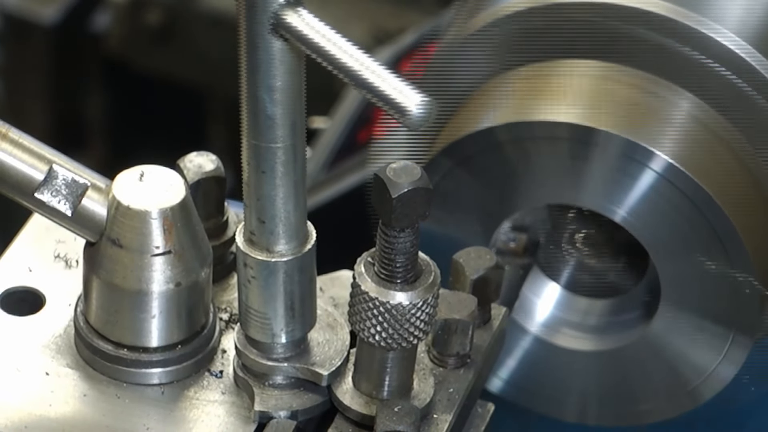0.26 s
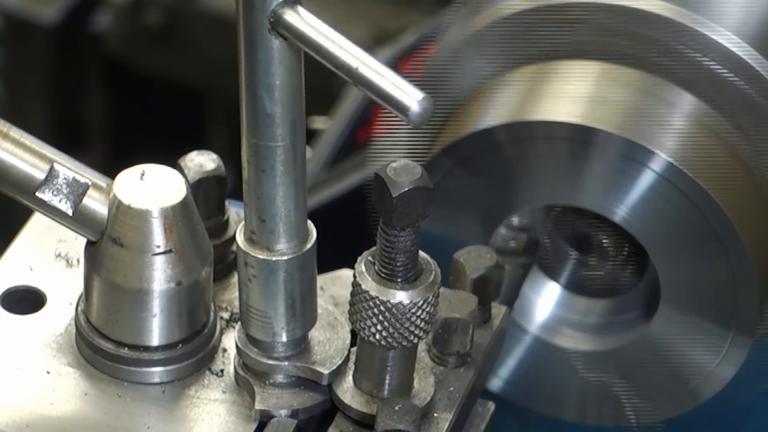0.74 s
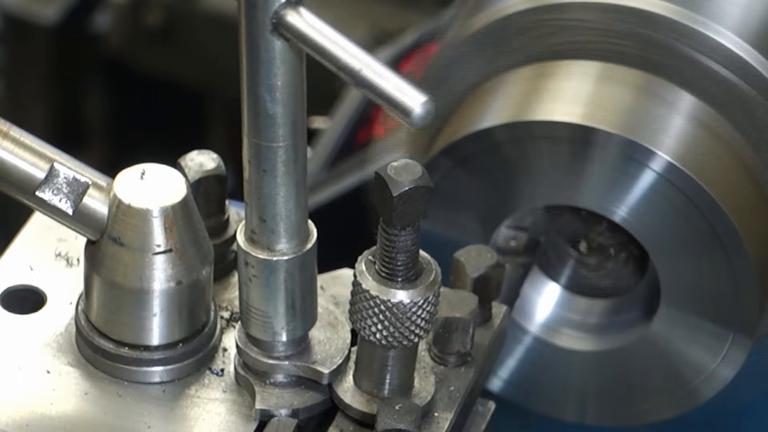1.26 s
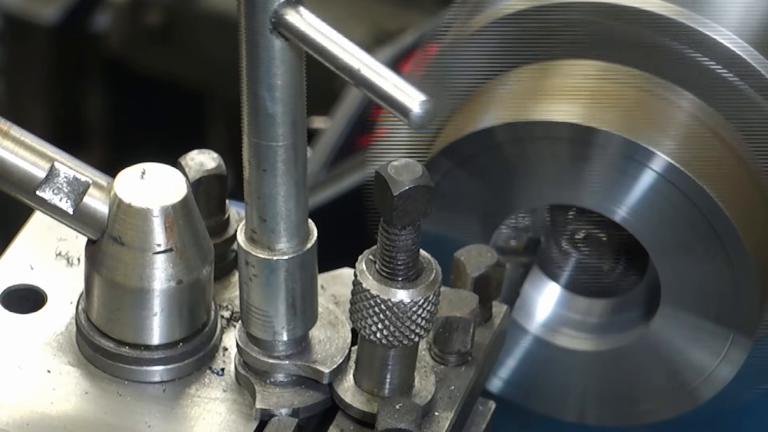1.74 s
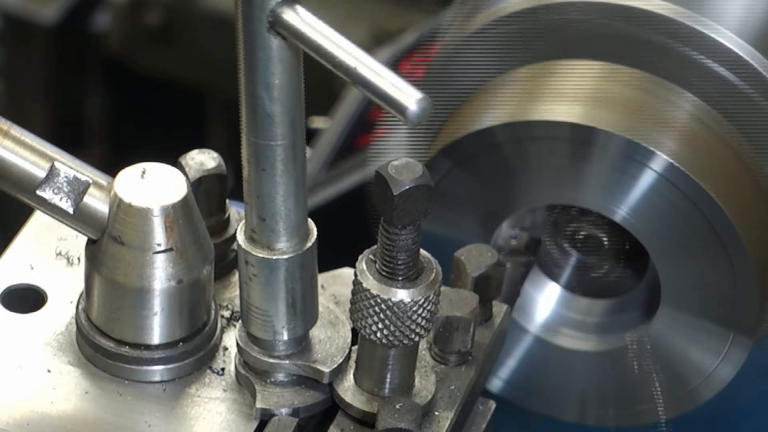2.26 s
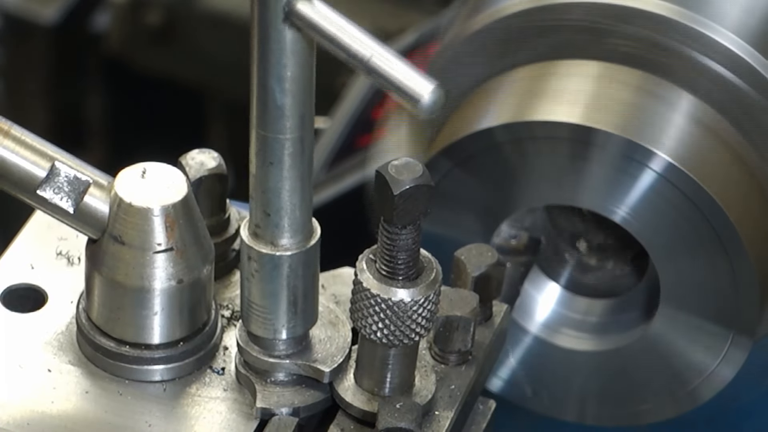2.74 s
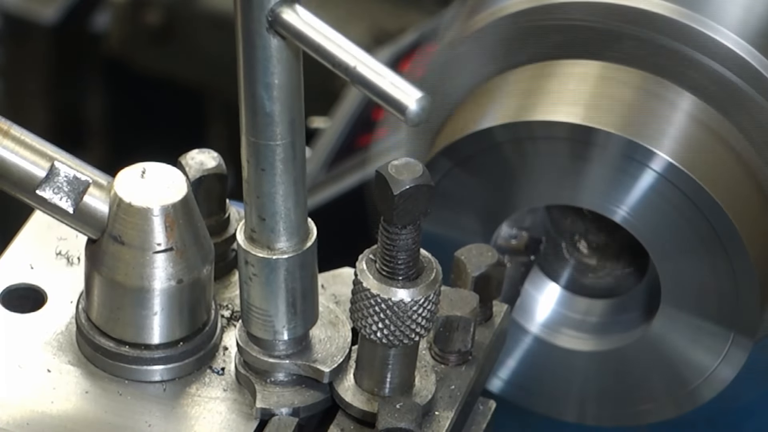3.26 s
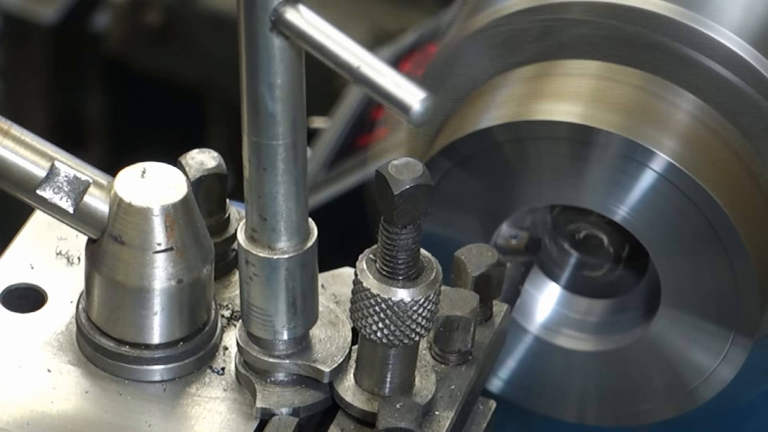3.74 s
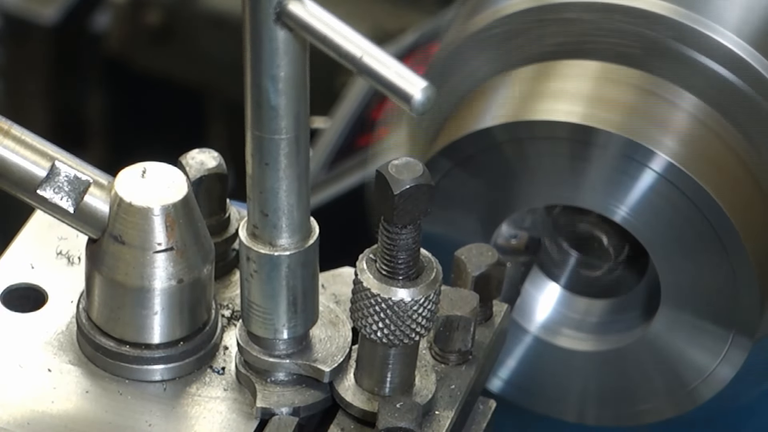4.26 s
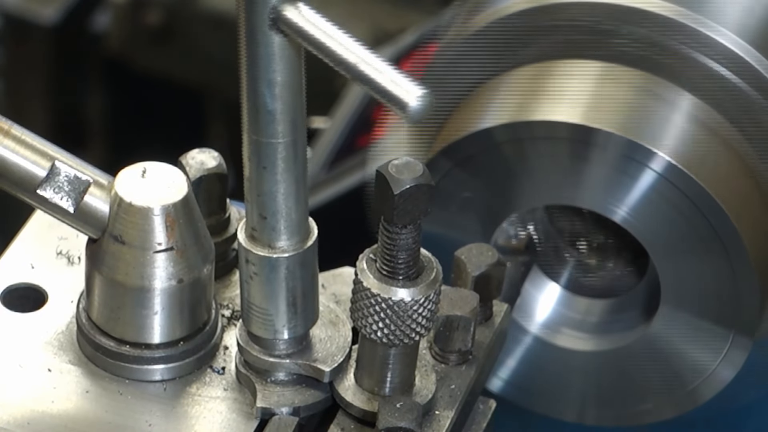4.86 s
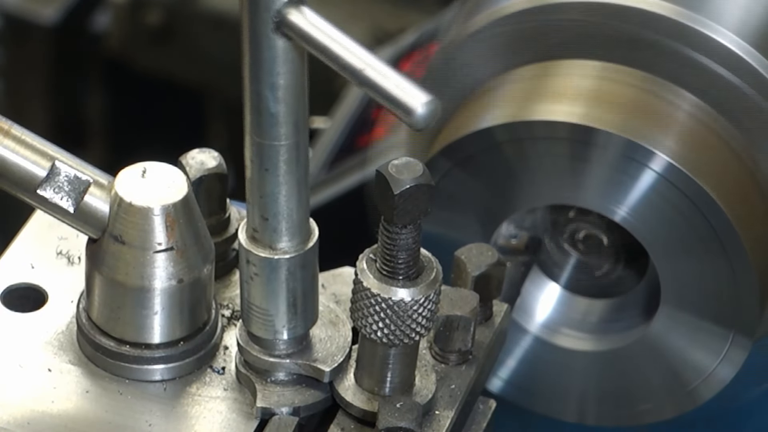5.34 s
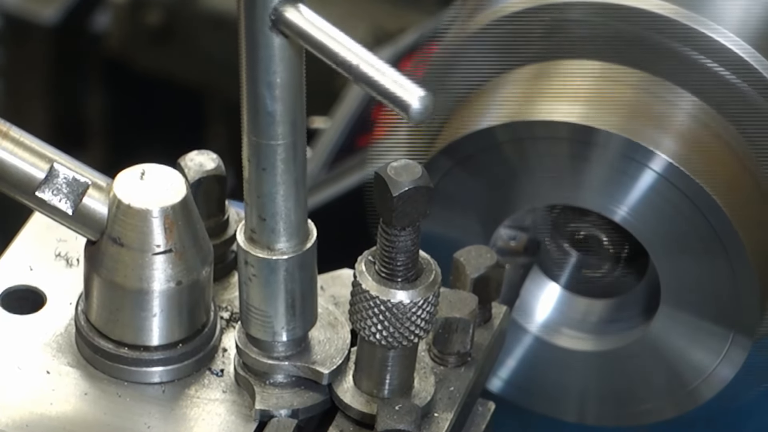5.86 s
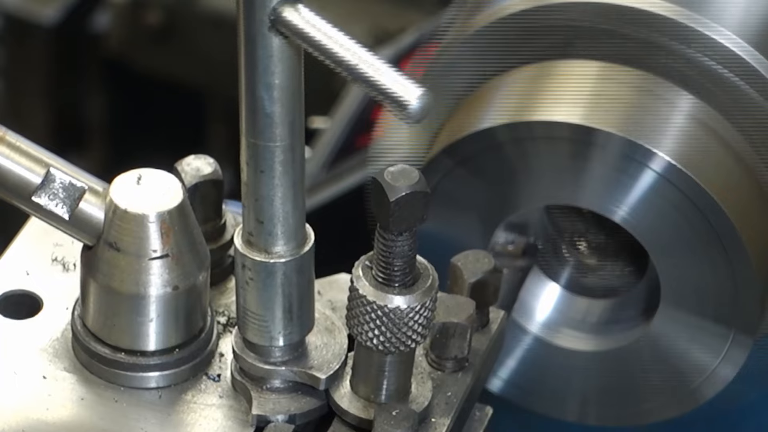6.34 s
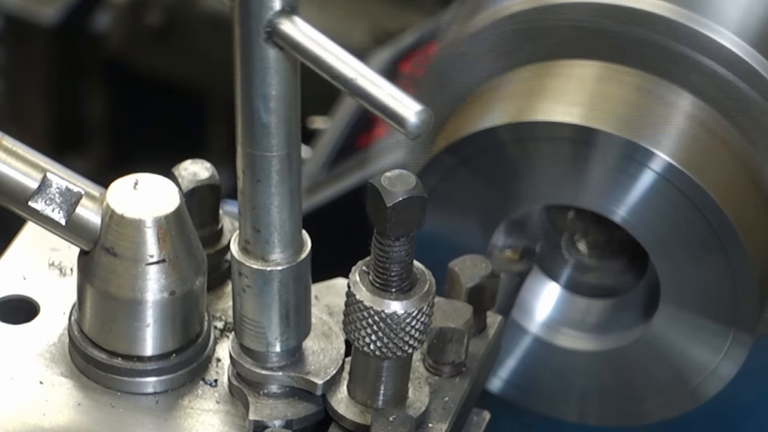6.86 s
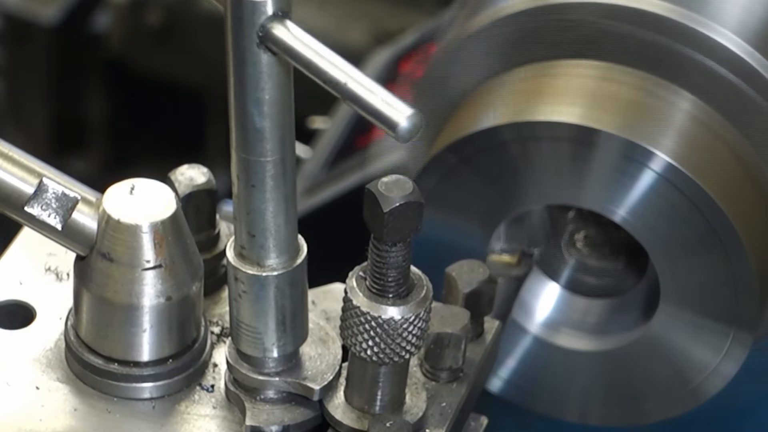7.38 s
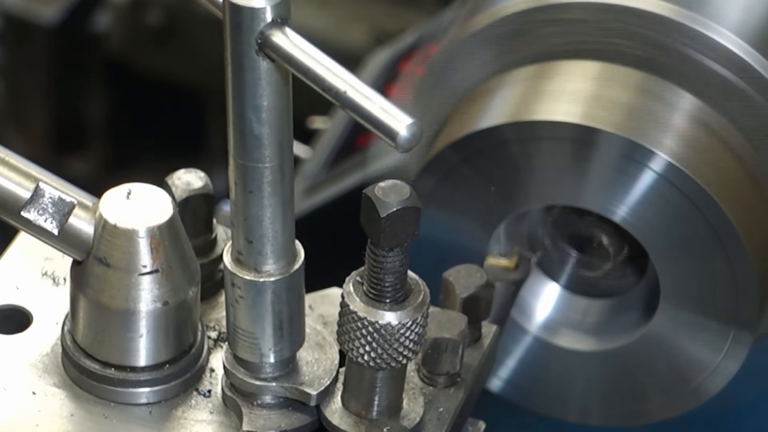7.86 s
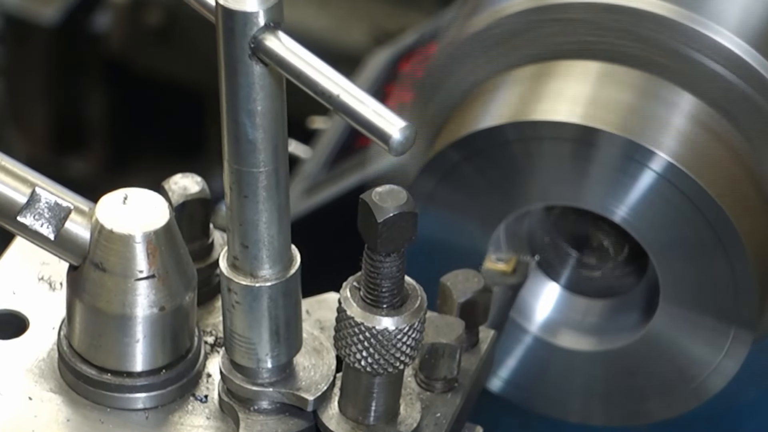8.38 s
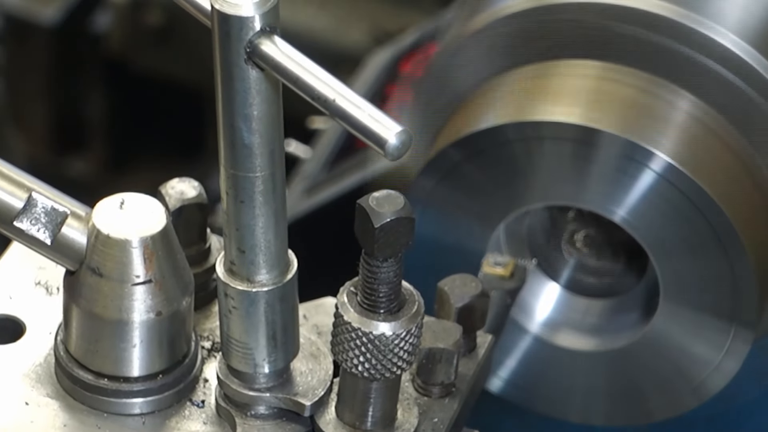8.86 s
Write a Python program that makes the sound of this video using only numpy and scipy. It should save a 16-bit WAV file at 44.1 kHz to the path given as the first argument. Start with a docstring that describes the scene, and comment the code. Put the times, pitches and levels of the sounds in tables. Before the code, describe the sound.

A metal lathe bores steel with a loud, rough, high squeal and hissing chips over a rumbling geared drive.

```python
"""A workshop, close to a metal lathe boring a steel part.
The boring bar chatters in a rough squeal near 1.9 kHz that falters, now and then locks to a purer tone,
and dies at the end. The chip hisses and rings the tool's high modes, swarf rasps in the bore, and the
geared drive rumbles and throbs underneath. Gain control ducks the rumble whenever the squeal swells."""
import sys
import numpy as np
from scipy import signal
from scipy.fft import rfft, irfft, next_fast_len
from scipy.io import wavfile
from scipy.ndimage import uniform_filter1d

SR = 44100
rng = np.random.default_rng(int(sys.argv[2]) if len(sys.argv) > 2 else 0)


def digitize_waveform(pressure):
    """Quantize a signal to 16-bit integers and store it at the path in sys.argv[1].

    Rows of a 2-D input are taken as channels; values are limited to [-1, 1].
    """
    field = np.atleast_2d(pressure).T
    bounded = np.clip(field, -1, 1)
    quanta = np.round(bounded * 32767).astype(np.int16)
    wavfile.write(sys.argv[1], SR, quanta)


N = 401751
T = np.arange(N) / SR
SIZE = next_fast_len(N + SR // 2, real=True)
HZ = np.arange(SIZE // 2 + 1) * SR / SIZE

# modes of the cutting edge: f/Hz, level/dB
EDGE_MODES = [(13513, 0), (12577, -5), (15110, -16)]
# swarf gathering in the bore: t/s, whistling rub/dB, coarse scrape/dB
SWARF_LEVELS = [(0, -39, -26), (5.7, -34.5, -42), (6.7, -21.5, -28), (7.2, -19.5, -23), (7.7, -19.5, -25.5),
                (9.02, -27.5, -26), (9.06, -52, -34)]


def gain_of(db):
    """Decibels to amplitude."""
    return 10 ** (np.asarray(db) / 20)


def unit_rms(x):
    """Scales to rms 1."""
    return x / np.sqrt(np.mean(abs(x) ** 2) + 1e-20)


def envelopes(rows):
    """Each column of a time table at every sample."""
    times, *columns = np.transpose(rows)
    return [np.interp(T, times, column) for column in columns]


def spectrum(points):
    """A spectrum table at every frequency."""
    f, value = np.transpose(points)
    return np.interp(np.log(HZ + 1), np.log(f + 1), value)


def filtered(x, gain):
    """Applies a frequency response."""
    return irfft(rfft(x, SIZE) * gain, SIZE)[..., :N]


def ring(x, modes):
    """Passes x through steep-sided resonances (f/Hz, width/Hz, level/dB); rms 1."""
    power = sum(gain_of(db) ** 2 / (1 + ((HZ - hz) / (.78 * width)) ** 2) ** 2
                for hz, width, db in modes)
    return unit_rms(filtered(x, np.sqrt(power)))


def wander(rate_hz):
    """Random motion up to a given rate; rms 1."""
    return unit_rms(filtered(rng.standard_normal(N), 1 / np.sqrt(1 + (HZ / rate_hz) ** 6)))


def repeating(x, turn_hz, share):
    """Makes a share of noise x come round again with every turn of a shaft."""
    loop = unit_rms(np.interp(T % (1 / turn_hz), T, x))
    return np.sqrt(share) * loop + np.sqrt(1 - share) * x[::-1]


def bump(s, length):
    """A smooth swell of height 1 around time s."""
    return np.exp(-(2 * (T - s) / length) ** 2)


def peak_hold(db, db_per_s):
    """Instant attack, steady release."""
    return np.maximum.accumulate(db + db_per_s * T) - db_per_s * T


def add(mix, s, sound):
    """Mixes a sound in at time s."""
    part = mix[max(round(s * SR), 0):][:len(sound)]
    part += sound[:len(part)]


def chatter():
    """How hard the bar swings, in dB above its usual swing; it never holds quite still."""
    swing = [(0, 1), (.45, .5), (.58, -2.5), (.85, 1), (1.35, -2), (1.9, 1.5), (2.74, 1), (3.02, -7),
             (3.32, -8), (3.345, -6.5), (3.49, 5), (3.83, -5), (4.02, 4), (4.72, -3.5), (4.78, 14),
             (4.85, 8.5), (4.89, 5), (5.35, 0), (5.65, 0.5), (5.77, -6.5), (6.35, 0), (6.85, -1),
             (7.2, -4.5), (7.8, -2), (8.62, -10.5), (8.995, -13), (9.05, -39)]  # the bar's swing: t/s, level/dB
    return envelopes(swing)[0] + wander(5)


def squeal(swing_db):
    """The bar vibrates by itself; the wavy surface left by the last turn jolts its swing and phase."""
    pitch = [(0, 1918), (4.1, 1925), (4.74, 1970), (4.92, 1890), (5.3, 1913), (5.48, 1860), (5.67, 1842),
             (5.73, 1925), (9.1, 1911)]  # the bar's note: t/s, f/Hz
    bar_modes = [(1760, 33, 0.5), (1841.4, 23.3, 4.5), (1869, 35, 1.5), (1936.5, 47, 6), (1989, 15, 3.5),
                 (2014, 16, 3.5), (2180, 32, -35.5)]  # resonances that radiate the squeal: f/Hz, width/Hz, level/dB
    spindle_hz, lock_db = 9.405, 4.5  # above lock_db the bar locks towards one tone
    roughness = np.maximum(.79 - .085 * np.maximum(swing_db - lock_db, 0), .25)
    push, twist = (repeating(wander(140), spindle_hz, share=.36) for _ in range(2))
    swing = (1 - roughness) + 1.15 * roughness * unit_rms(push + 1j * twist)
    swing /= np.sqrt(abs(swing) ** 2 + .8 ** 2)  # the edge leaves the cut, which caps the swing
    tone = swing * np.exp(2j * np.pi * np.cumsum(envelopes(pitch)[0]) / SR)
    stutter = np.clip(-swing_db / 9, 0, 1)  # a barely fed bar falters
    body = ring(tone.real, bar_modes) * gain_of(3.2 * stutter * wander(35))
    body /= np.sqrt(uniform_filter1d(body ** 2, size=4400) + 1e-6)  # the cut feeds it until it settles
    octave = gain_of(-16) * (1 - roughness) * (tone ** 2).real
    turn = 2 * np.pi * spindle_hz * T
    # uneven stock loads the tool in step with the spindle
    runout = 1 + .11 * np.cos(2 * turn) + .05 * np.cos(3 * turn) + .08 * np.cos(10 * turn)
    return gain_of(swing_db - 3) * unit_rms(runout * (body + octave))


def friction(spurts, spurt_db, flutter_db):
    """Rubbing noise that rides the chip's spurts, with a flutter of its own."""
    return rng.standard_normal(N) * gain_of(spurt_db * spurts + flutter_db * wander(33))


def grains(per_s):
    """A crackle of tiny fractures of uneven size."""
    size = gain_of(2.1 * np.minimum(rng.exponential(1, N), 4))
    return unit_rms((rng.random(N) < per_s / SR) * rng.standard_normal(N) * size)


def bite():
    """Level dips in dB: the chip thins for a moment as the edge loses its bite."""
    lapses = [(4.814, .08, 0), (5.736, .09, -7.5), (9.1, .12, -1.5)]  # dips: centre t/s, length/s, level/dB
    return sum(db * bump(s, length) for s, length, db in lapses)


def chip(swing_db, spurts, bite_db):
    """The chip shears off in uneven spurts that hiss and ring the post and tool."""
    colour = [(0, 1.7, -3), (1.3, 1.5, -1), (3.7, 0, 1), (5.55, -1.5, 2), (6.05, 2.5, 2.5),
              (6.85, -1, -0.5), (7.22, 4.5, 1), (7.6, 1, -1.5), (9.1, 2, -2)]  # slow drift of the ringing: t/s, post/dB, tip/dB
    hiss_eq = [(1500, -13), (2800, 6), (3500, 1.5), (4100, 5), (4750, -2.5), (5450, 2.5), (6000, 1),
               (7200, 3.5), (9000, 1.5), (11000, 1), (13300, -4.5), (14400, -1), (16000, -5.5)]  # hiss of shearing metal: f/Hz, level/dB
    # modes of the tool's post, shank and tip: f/Hz, width/Hz, level/dB
    post_modes = [(1690, 240, -8), (2125, 80, 0.5), (2300, 35, -17.5), (2318, 64, 0), (2431, 130, -6),
                  (2718, 180, -8.5), (2930, 68, -4.5), (3205, 360, -13), (4005, 105, -19.5)]
    shank_modes = [(7786, 63, 0.5), (7950, 42, 0), (7930, 110, -3)]
    tip_modes = [(9670, 110, 3.5), (9860, 96, 1.5), (10020, 170, -3), (10250, 200, -10), (11100, 130, -2.5),
                 (11740, 140, -2.5), (12240, 300, -6.5)]
    thin_level = [(0, -50), (2.75, -42), (2.95, -30), (3.35, -39), (3.5, -45), (3.75, -38), (4.7, -33),
                  (9.1, -56)]  # a thin ring that comes and goes: t/s, level/dB
    post_db, tip_db = envelopes(colour)
    force_db = np.maximum(swing_db, -18)  # plain shearing keeps up the hiss and the post's ring
    rub_db = envelopes(SWARF_LEVELS)[0]
    # the shank's ring gets quieter while the whistling rub is loud
    shank_db = swing_db - np.maximum(rub_db + 22.5, 0)
    shear = friction(spurts, spurt_db=.35, flutter_db=1) + .24 * grains(per_s=500)
    hiss = unit_rms(filtered(shear, gain_of(spectrum(hiss_eq))))
    edge = ring(friction(spurts, 1.5, 0), [(hz, 130, db) for hz, db in EDGE_MODES])
    post = ring(friction(spurts, .7, 1.1), post_modes)
    shank = ring(friction(spurts, .6, 2), shank_modes)
    tip = ring(friction(spurts, 1, 1.4), tip_modes)
    thin = ring(friction(spurts, -1.5, 3.5), [(5390, 240, 0)])
    return (gain_of(-19.5 + bite_db + .27 * force_db) * hiss
            + gain_of(-15 + post_db + .44 * force_db) * post
            + gain_of(-21 + shank_db + 1.4 * wander(4.1)) * shank
            + gain_of(-20 + tip_db + bite_db + .4 * swing_db + 1.1 * wander(7)) * tip
            + gain_of(-31 + shank_db) * edge
            + gain_of(envelopes(thin_level)[0]) * thin)


def swarf(spurts, bite_db):
    """Swarf rubs in the bore with a high whistle; tumbling, it catches the scrape resonances in bursts."""
    # resonances of the rub and the scrape: f/Hz, width/Hz, level/dB
    rub_modes = [(11360, 140, -2.5), (11500, 380, -11), (11500, 200, -13), (12300, 160, -9),
                 (13100, 500, -14)]
    scrape_modes = [(3420, 850, -6), (4600, 700, -15), (5070, 590, -11.5), (8280, 450, 0.5)]
    clumps = [(8.176, .08, -23), (8.369, .08, -26), (8.635, 0.19, -23.5), (8.85, .12, -32)]  # clumps rasping on the bore: centre t/s, length/s, level/dB
    rub_db, scrape_db = envelopes(SWARF_LEVELS)
    rub = ring(friction(spurts, spurt_db=1.1, flutter_db=1), rub_modes)
    grit = friction(spurts, spurt_db=-.5, flutter_db=1) + .53 * grains(per_s=320)
    scrape = sum(gain_of(db + 3.5 * wander(22)) * ring(grit, [(hz, width, 0)])
                 for hz, width, db in scrape_modes)
    rasps = sum(gain_of(db) * bump(s, length) for s, length, db in clumps)
    return gain_of(rub_db + bite_db) * rub + (gain_of(scrape_db) + rasps) * unit_rms(scrape)


def squeaks(swing_db):
    """The cutting edge sings for a moment on its highest modes, with an unsteady pitch."""
    accents = [(0.222, -18), (1.031, -20), (1.877, -18), (4.305, -17), (4.479, -17), (4.803, -8),
               (4.833, -7), (4.937, -15), (5.068, -7), (6.369, -16), (6.438, -17), (6.671, -17),
               (7.323, -25), (7.453, -22)]  # the loudest squeaks: t/s, level/dB
    faint_per_s = 4
    t = np.arange(SR // 10) / SR
    swell = np.exp(-((t - .014) / .0075) ** 2)
    catches = (rng.random(N) < faint_per_s / SR) * gain_of(-21 + np.minimum(swing_db, 0))
    for s, db in accents:
        add(catches, s - .006, gain_of([db]))
    song = sum(gain_of(db) * np.sin(2 * np.pi * hz * T + wander(110)) for hz, db in EDGE_MODES)
    return signal.oaconvolve(catches, swell)[:N] * song


def snaps():
    """A chip breaks with a short bright tick."""
    breaks = [(1.9794, -14), (2.7412, -17), (3.8656, -13), (4.7144, -8), (5.405, -8), (7.4183, -11)]  # chips snapping off: t/s, level/dB
    ticks, t = np.zeros(N), np.arange(SR // 25) / SR
    burst = np.exp(-((t - .007) / .005) ** 2)
    for s, db in breaks:
        add(ticks, s - .003, gain_of(db) * burst * rng.standard_normal(len(t)))
    return filtered(ticks, 1 / (1 + ((HZ - 10500) / 3500) ** 4))


def drive():
    """Gear teeth knock on the headstock, throbbing with the motor and the belt, over a low hum."""
    headstock_modes = [(106, 19, -18), (172, 18, -16), (211.8, 10.6, -6), (233.8, 15.7, -4.5),
                       (281.2, 19.6, 0), (365.5, 44, -7.5), (416.5, 20, -4), (483, 32.5, 1), (544, 19, 0),
                       (587, 36.5, -0.5), (639.5, 11, -2.5), (744.5, 89, -5), (970, 85, -11),
                       (1050, 33, -6.5), (1175, 100, -9.5), (1298, 42, -4), (1392, 75, -10.5),
                       (1460, 91, -18.5)]  # headstock and guards: f/Hz, width/Hz, level/dB
    hum_level = [(0, -41), (2.4, -47), (2.6, -39), (3.6, -45), (4.2, -40.5), (5.7, -38), (5.9, -51),
                 (7, -43), (7.25, -35), (7.6, -47), (8.3, -37), (9.1, -44)]  # the wavering hum: t/s, level/dB
    belt_hz, motor_hz, gear_hz = 7.53, 29.8, 92.5
    teeth = 1 + np.exp(-(gear_hz * T % 1) / .25)
    throb = (1 + .18 * np.cos(2 * np.pi * motor_hz * T)) * (1 + .12 * np.cos(2 * np.pi * belt_hz * T))
    knocks = unit_rms(repeating(rng.standard_normal(N), belt_hz, share=.17) * teeth * throb)
    low_share = 1 / (1 + (HZ / 900) ** 8)
    bearings = filtered(rng.standard_normal(N), np.sqrt(1 - low_share))  # an even rush above the knocks
    force = filtered(knocks, np.sqrt(low_share)) + bearings
    hum_db = envelopes(hum_level)[0] + 3 * wander(7)
    hum = gain_of(hum_db) * np.sin(2 * np.pi * 132 * T + .6 * wander(5))
    low_bed = gain_of(-58.5) * ring(rng.standard_normal(N), [(62, 26, 0)])
    return gain_of(-18.5) * ring(force, headstock_modes) + hum + low_bed


def workshop_stereo(direct):
    """The sound reaches the right microphone first; scatter from the workshop widens the treble."""
    likeness = [(150, 1), (640, .994), (1900, .98), (2300, .86), (3100, .68), (6820, .46), (15000, .28)]  # how alike the channels are: f/Hz, coherence/0-1
    balance = [(1900, 0), (3000, -1), (4400, -3), (8000, -2), (15000, -4.3)]  # stereo balance: f/Hz, left minus right/dB
    lead = [(60, 0), (250, -.11), (700, -.22), (1300, -.26), (1900, -.36), (2500, -.6), (3500, -1),
            (5000, -1.5), (7600, -.65), (15000, -.6)]  # phase between the channels: f/Hz, left lead/rad
    t = np.arange(SR // 3) / SR
    echoes = rng.standard_normal(len(t)) * gain_of(-60 * t / .35)
    scatter = unit_rms(rfft(echoes, SIZE).real)  # reflections shift each frequency's phase
    spread = np.sqrt(-np.log(np.clip(spectrum(likeness), 1e-3, 1)) / 2)
    phase = spectrum(lead) / 2 + spread * scatter
    side = np.array([[1], [-1]])
    return filtered(direct, gain_of(side * spectrum(balance) / 2) * np.exp(1j * side * phase))


def scene():
    """The bar's swing drives squeal, chip and squeaks; swarf, snaps and the drive fill in around them."""
    swing_db, bite_db, spurts = chatter(), bite(), wander(42)
    cut = squeal(swing_db) + chip(swing_db, spurts, bite_db) + swarf(spurts, bite_db)
    return workshop_stereo(cut + squeaks(swing_db) + snaps() + drive())


def level_db(x, samples):
    """Running power of both channels in dB."""
    return 10 * np.log10(abs(uniform_filter1d((x ** 2).mean(0), size=samples)) + 1e-9)


def record(dry):
    """Gain control ducks the mix as the squeal grows; a fast limiter and a low-pass follow."""
    knee_db, limit_db, settle_s, cutoff_hz = -14.5, -5.8, .035, 15900
    excess_db = np.maximum(level_db(dry, int(settle_s * SR) + 1) - knee_db, 0)
    ducked = dry / gain_of(.41 * excess_db + .22 * peak_hold(excess_db, db_per_s=10))
    over_db = np.maximum(peak_hold(level_db(ducked, 90), db_per_s=120) - limit_db, 0)
    limited = ducked / gain_of(uniform_filter1d(over_db, size=90))
    lowpass = signal.firwin(1023, cutoff_hz, window=("kaiser", 9), fs=SR)
    return signal.oaconvolve(limited, lowpass[None], "same")


dry = scene()
out = record(dry)
digitize_waveform(out)
```